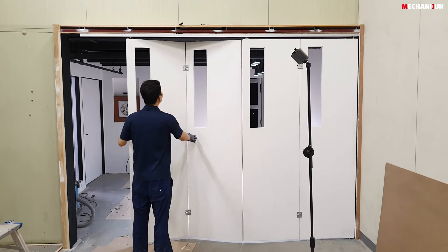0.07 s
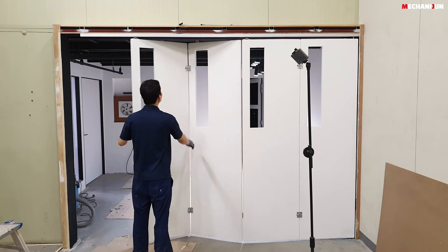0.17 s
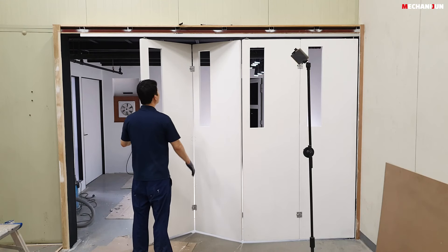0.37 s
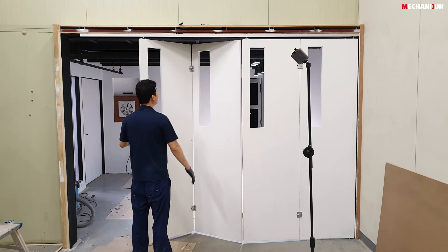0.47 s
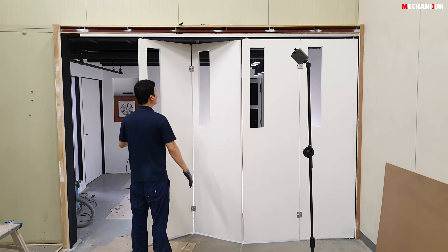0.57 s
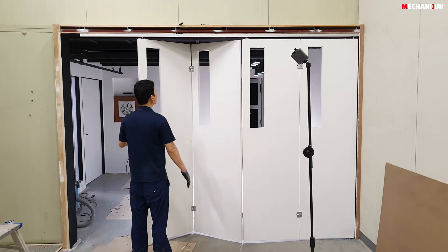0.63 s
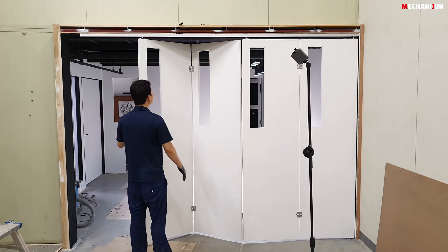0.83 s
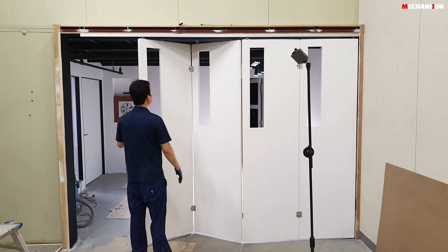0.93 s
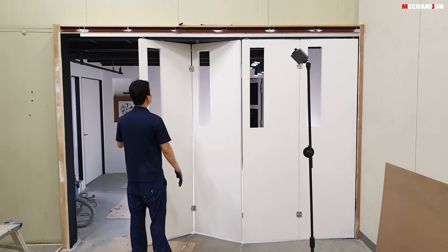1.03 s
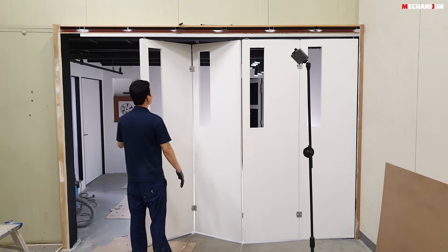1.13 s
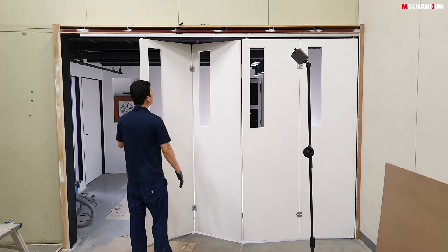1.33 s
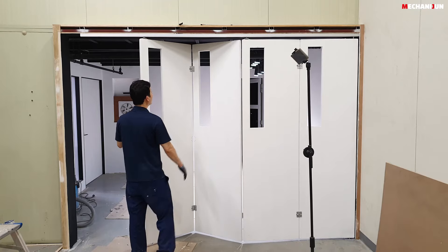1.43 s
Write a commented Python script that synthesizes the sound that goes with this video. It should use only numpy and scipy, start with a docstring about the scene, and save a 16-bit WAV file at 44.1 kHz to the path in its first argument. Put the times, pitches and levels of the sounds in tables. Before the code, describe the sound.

A folding door is pushed shut in a bare workshop. A hinge rings faintly and hangers rumble in their track. A steel latch clacks twice around 0.2 seconds as an edge rubs. At 0.3 seconds the wooden panels slam with another clack, then rebound, booming into the room. Fittings tick at 0.5 seconds, a dull thud follows at 1.1, and a soft hiss swells near the end.

```python
"""A hinge rings and hangers rumble in their track as a folding door is pushed shut in a bare workshop.
The steel latch clacks twice and a panel edge rubs; then the wooden panels slam, with one more clack,
and rebound, booming into the room. Loose fittings tick and a dull thud follows as the door settles.
Near the end a soft hiss swells over the quiet sound of the room."""
import sys
import numpy as np
from scipy import signal
from scipy.fft import rfft, irfft
from scipy.io import wavfile
from scipy.ndimage import uniform_filter1d

SR = 44100
rng = np.random.default_rng(int(sys.argv[2]) if len(sys.argv) > 2 else 0)


def master(y):
    """Save y as 16-bit WAV."""
    cut = np.clip(np.atleast_2d(y).T, -1, 1)
    pcm = np.round(cut * 32767)  # scale
    wavfile.write(sys.argv[1], SR, pcm.astype(np.int16))


N = 66150
T = np.arange(N) / SR
HZ = np.maximum(np.fft.rfftfreq(N, 1 / SR), 1)

# Stereo width. Each row: frequency in Hz, dB by which the ears' difference exceeds what they share.
STEREO_WIDTH = [(60, -34), (140, -20), (260, -17.5), (500, -9), (1000, 0), (2000, 3), (4000, 1),
                (16000, -1)]


def amp(db):
    """Turn decibels into a gain."""
    return 10 ** (np.asarray(db) / 20)


def curve(points):
    """Join rows of frequency and value into a curve over all frequencies."""
    hz, value = np.array(points, float).T
    return np.interp(np.log(HZ), np.log(hz), value)


def hump(hz, octaves):
    """A bell-shaped band of gain around one frequency."""
    return np.exp(-.5 * (np.log2(HZ / hz) / octaves) ** 2)


def fade(fade_s):
    """A smooth decay. A fade time is how long a sound takes to drop by 60 dB."""
    return np.exp(-np.log(1000) * T / fade_s)


def at(start_s, sound):
    """Delay a sound until its start time."""
    delay = int(start_s * SR)
    return np.pad(sound[:, :N - delay], ((0, 0), (delay, 0)))


def noise(colour):
    """Stereo noise of strength 1, alike in both ears in the bass. Colour is a gain per frequency."""
    # Each row: frequency in Hz, dB by which the left is louder than the right.
    balance = [(100, 2.5), (500, 1), (1100, 0.5), (2000, 0.4), (4000, -0.7), (8000, -3), (16000, -3)]
    shared, difference = rfft(rng.standard_normal((2, N)))
    ears, width = np.array([[1], [-1]]), amp(curve(STEREO_WIDTH))
    spectrum = (shared + ears * width * difference) / np.hypot(1, width)
    sound = irfft(colour * spectrum * amp(ears * curve(balance) / 2), N)
    return sound / np.sqrt(np.mean(sound ** 2))


def reverb(colour):
    """The room's echo of a blow: it builds quickly, then each band dies at its own rate."""
    # Each row: frequency in Hz, the room's fade time in seconds.
    room_fades = [(60, 0.94), (125, 0.28), (300, 0.67), (700, 0.65), (1600, 0.5), (4000, 0.5), (8000, 0.4),
                  (16000, 0.31)]
    spectrum, centres = rfft(noise(colour)), np.log([hz for hz, _ in room_fades])
    tail, build_s = 0, .004
    for share, (_, fade_s) in zip(np.eye(len(centres)), room_fades):
        band = np.interp(np.log(HZ), centres, share)
        tail += irfft(spectrum * band, N) * fade(fade_s)
    return tail * (1 - np.exp(-T / build_s))


def burst(colour, fade_s, echo_db):
    """A short crack and its echo."""
    return noise(colour) * fade(fade_s) + amp(echo_db) * reverb(colour)


def ring(tones, rise_cycles):
    """A struck part's tones build up and fade; the higher ones reach the two ears out of step."""
    out, width = 0, amp(curve(STEREO_WIDTH))
    for (hz, db, fade_s), sign in zip(tones, rng.choice([-1, 1], len(tones))):
        ear_phase = sign * np.arctan(np.interp(hz, HZ, width)) * np.array([[1], [-1]])
        rise = 1 - np.exp(-hz * T / rise_cycles)
        out += amp(db) * rise * fade(fade_s) * np.sin(2 * np.pi * hz * T + ear_phase)
    return out


def background():
    """The room's low murmur, a faint high whine and a soft hiss that swells late."""
    # Each row of both colours: frequency in Hz, relative level in dB.
    room_colour = [(15, -63), (25, -44), (70, 2.5), (149, -14.5), (185, -5), (236, -3.5), (270, -7.5),
                   (463, -11), (734, -10), (796, -17), (1070, -17), (1650, -22.5), (8360, -36),
                   (10700, -43), (16000, -60)]
    hiss_colour = [(300, -12), (1200, -1.5), (2500, -0.5), (5000, 0.5), (9000, 0.5), (13000, 0.5),
                   (16000, -1)]
    # Each row: time in seconds, level of the hiss in dB.
    hiss_swell = [(1.0, -74.5), (1.18, -67.5), (1.3, -61), (1.41, -58.5), (1.5, -61)]
    hiss_db = np.interp(T, *np.array(hiss_swell).T)
    hiss = amp(hiss_db) * noise(amp(curve(hiss_colour)))
    murmur = amp(-59) * noise(amp(curve(room_colour)))
    whine = amp(-77.5) * noise(hump(hz=10700, octaves=.039))
    return murmur + whine + hiss


def hangers():
    """The hangers that carry the door rumble along their track and come to rest."""
    # Each row: frequency in Hz, relative level in dB.
    rumble_colour = [(35, -33.5), (60, -12), (323, -5.5), (437, -15), (515, -9.5), (666, -18.5), (946, -16),
                     (1340, -16), (1950, -28), (10500, -36.5), (16000, -44)]
    stop_s, fall_db_per_s, bass_cut_hz = .58, 83, 60
    bass_cut = HZ ** 2 / (HZ ** 2 + bass_cut_hz ** 2)
    level_db = -53 - fall_db_per_s * np.maximum(T - stop_s, 0)
    return amp(level_db) * noise(amp(curve(rumble_colour)) * bass_cut)


def hinge():
    """A hinge rings out at the very start."""
    # Each row: frequency in Hz, level in dB, fade time in seconds.
    hinge_tones = [(659, -51, .4), (2960, -53, .12), (4050, -66, .14), (6250, -62, .16)]
    return ring(hinge_tones, rise_cycles=.33)


def fittings():
    """The door's edge and loose fittings tick as they hit something hard."""
    # Each row: start in seconds, level in dB, pitch in Hz, width in octaves, relative echo in dB.
    contacts = [(.3045, -24.5, 1570, 0.56, -10), (.3078, -20, 694, 0.27, -10),
                (.4965, -50.5, 3970, 0.25, -3), (.4985, -51, 5000, 0.083, -6.5),
                (0.498, -53, 8300, 0.55, -2.5), (0.514, -55, 10900, 0.69, -11),
                (1.137, -58.5, 10000, .7, -19)]
    return sum(at(start_s, amp(db) * burst(hump(hz, octaves), fade_s=.024, echo_db=echo_db))
               for start_s, db, hz, octaves, echo_db in contacts)


def panel_edge():
    """A panel edge rubs in small jerks, harder up to its tightest point, then easing off."""
    # Each row: frequency in Hz, relative level in dB.
    rub_colour = [(100, 9.5), (220, 1.5), (420, -1.5), (780, 5), (1000, -1), (1300, -0.5), (2000, -14.5),
                  (5000, -22), (16000, -26)]
    start_s, tightest_s, slope_db_per_s, jerk_db = .11, .28, 99, .5
    grip_db = -35 - slope_db_per_s * abs(T - tightest_s)
    rub = noise(amp(curve(rub_colour))) * (T > start_s)
    jerks = uniform_filter1d(rng.standard_normal(N), size=200)
    return rub * amp(grip_db + jerk_db * jerks / jerks.std())


def latch():
    """Steel parts snap against each other, and their tones ring on into the room."""
    # Each row: start in seconds, snap in dB, echo in dB, treble tilt in dB per octave, ringing (0 to 1).
    clacks = [(.1484, -24, -34, 2.3, 1), (.1499, -22.3, -32.5, 2.3, 1), (.2368, -24.5, -34, -.5, .3),
              (.2422, -25.5, -36.5, -1, .7), (.3120, -27, -34.5, -.3, .25)]
    # Steel hitting steel. Each row: frequency in Hz, relative level in dB.
    contact_colour = [(300, -20), (1100, 0.5), (1900, -2), (3000, -2.5), (4500, -2.5), (7000, -0.5),
                      (11000, -1.5), (14000, -6), (16000, -6)]
    # Each row: frequency in Hz, half-width in Hz, boost in dB at full ringing.
    steel_tones = [(3390, 27, 6.5), (4450, 25, -3), (5100, 40, -9), (5150, 32, 10), (5883, 67, 7),
                   (5650, 980, 7.5), (7095, 22, -0.5), (7130, 45, 11), (7750, 20, -4), (8100, 1000, 6),
                   (13600, 200, 10)]
    steel_db = sum(db / (1 + ((HZ - hz) / width_hz) ** 2) for hz, width_hz, db in steel_tones)
    out = 0
    for start_s, snap_db, echo_db, tilt, ringing in clacks:
        contact_db = curve(contact_colour) + tilt * np.log2(HZ / 6000)
        snap = noise(amp(contact_db + ringing * steel_db / 2)) * fade(.014)
        echo = reverb(amp(contact_db + ringing * steel_db))
        out += at(start_s, amp(snap_db) * snap + amp(echo_db) * echo)
    return out


def panels():
    """Each blow cracks, bends a panel with a thump and leaves it booming; soft blows lose treble."""
    # Each row: start in seconds, level in dB, treble cut in Hz, relative thump and boom in dB.
    blows = [(0.138, -45.5, 246, 3, 6.5), (0.164, -65, 399, 9, -6), (0.267, -33.5, 730, -13, -1.5),
             (.3066, -20.5, 1950, 1, -3), (0.3204, -26.5, 1390, 11, 1.5), (.336, -25, 410, 5, -9.5),
             (0.3817, -24.5, 1020, -2.5, -6.5), (0.423, -44, 414, 22.5, 0), (.449, -41, 442, 15.5, -7),
             (0.497, -39.5, 386, 6.5, -3), (.752, -49.5, 450, 0, -3.5), (1.1177, -41.5, 1300, 7, -9),
             (1.139, -41, 350, 6.5, -4.5), (1.170, -42, 406, 1.5, -9.5)]
    # Each row: frequency in Hz, relative level in dB, fade time in seconds.
    panel_tones = [(79.2, -18, 1), (98.2, -2, 1), (124.23, 2, 0.78), (159, -17, 0.13), (198.1, 0, 0.39),
                   (293.3, -6, 0.49), (369.6, -13.5, 0.61), (425.5, -13.5, 0.36), (459, -14, 0.93),
                   (547, -15, 1), (612, -11.5, 0.7), (701, 1, 0.17), (822, -15, 0.77), (869, -6, 0.38),
                   (1200, -7.5, 0.19), (1613, -7, 0.49), (2300, -16.5, 0.41)]
    # The crack of the wood. Each row: frequency in Hz, relative level in dB.
    wood_colour = [(30, -32), (55, 6), (75, -9.5), (125, -0.5), (230, -3.5), (450, -8), (720, -7.5),
                   (1050, -14.5), (1450, -13), (1850, -22), (2150, -16), (3200, -19.5), (6000, -12),
                   (16000, -66)]
    thump_hz, thump_rise_s, thump_fade_s = 123.8, .0027, .046
    bend = fade(thump_fade_s) * (1 - np.exp(-T / thump_rise_s))
    thump = bend / bend.max() * np.sin(2 * np.pi * thump_hz * T)
    boom = amp(-4) * ring(panel_tones, rise_cycles=.68)
    out = 0
    for start_s, db, treble_cut_hz, thump_db, boom_db in blows:
        crack = burst(amp(curve(wood_colour)), fade_s=.086, echo_db=-3)
        blow = crack + amp(thump_db) * thump + amp(boom_db) * boom
        soften = signal.butter(2, treble_cut_hz, fs=SR, output="sos")
        out += at(start_s, amp(db) * signal.sosfilt(soften, blow))
    return out


def scene():
    """All the parts of the door, heard over the room."""
    return latch() + panels() + panel_edge() + hangers() + fittings() + hinge() + background()


def record(dry):
    """Cut away the deep bass and the highest treble."""
    low_hz, top_hz = 80, 15700
    bass_cut = signal.butter(4, low_hz, "high", fs=SR, output="sos")
    treble_cut = signal.ellip(12, .2, 80, top_hz, fs=SR, output="sos")
    return signal.sosfilt(treble_cut, signal.sosfilt(bass_cut, dry))


dry = scene()
out = record(dry)
master(out)
```